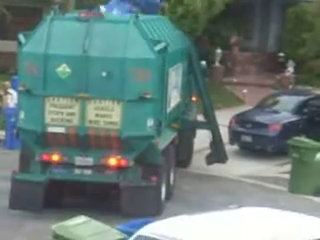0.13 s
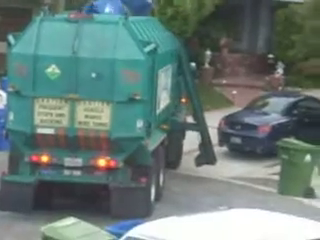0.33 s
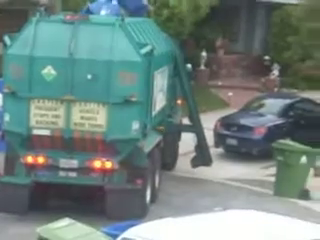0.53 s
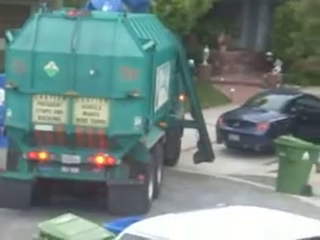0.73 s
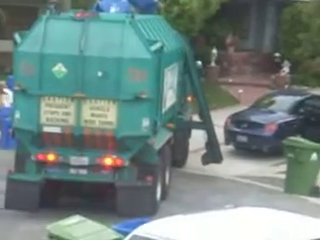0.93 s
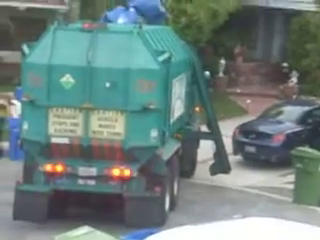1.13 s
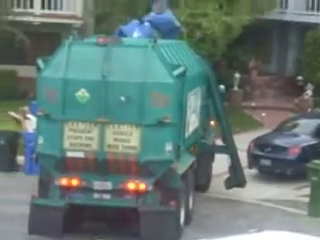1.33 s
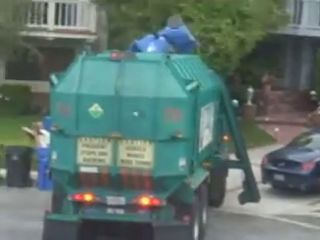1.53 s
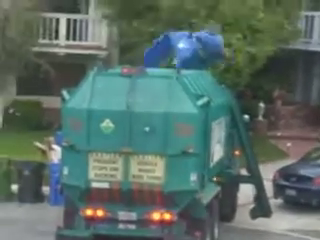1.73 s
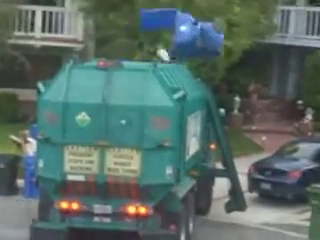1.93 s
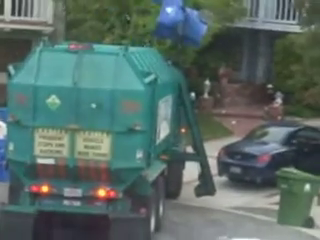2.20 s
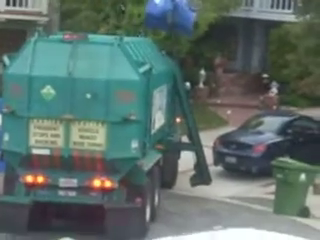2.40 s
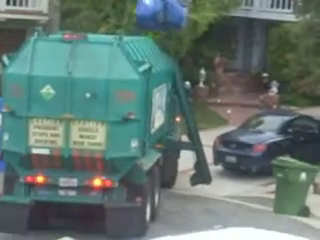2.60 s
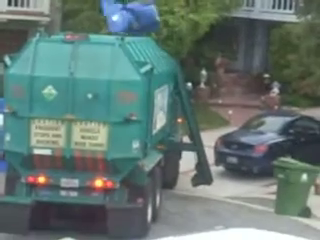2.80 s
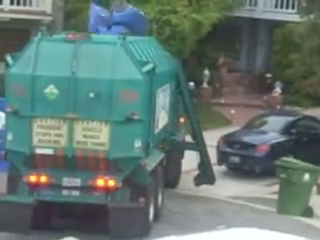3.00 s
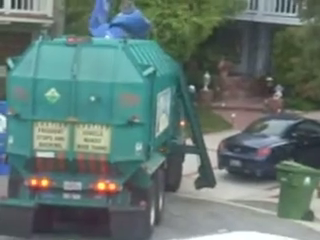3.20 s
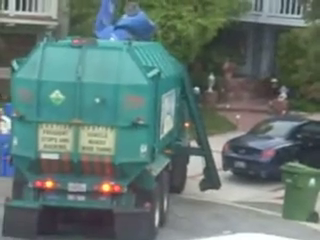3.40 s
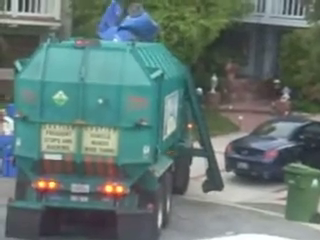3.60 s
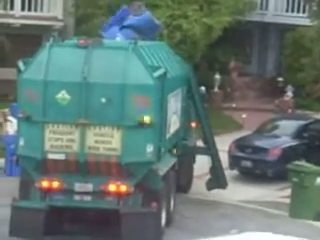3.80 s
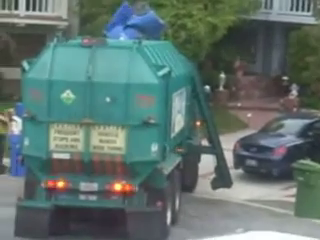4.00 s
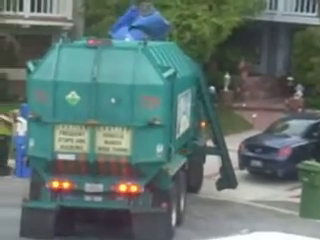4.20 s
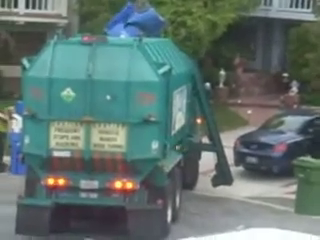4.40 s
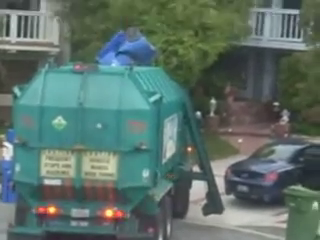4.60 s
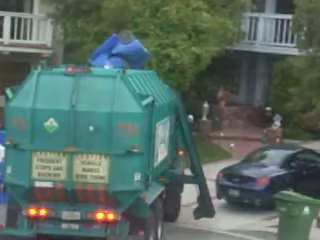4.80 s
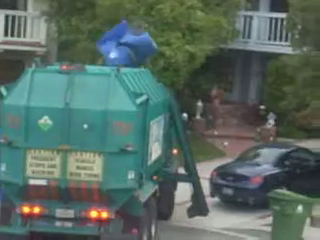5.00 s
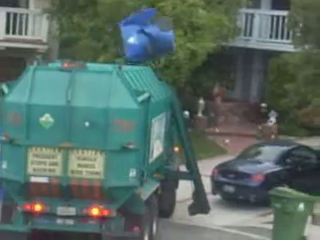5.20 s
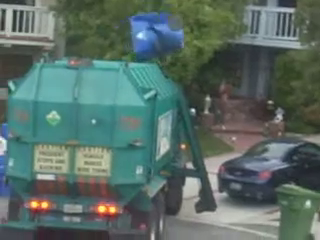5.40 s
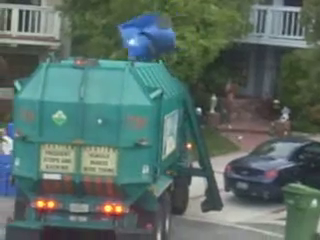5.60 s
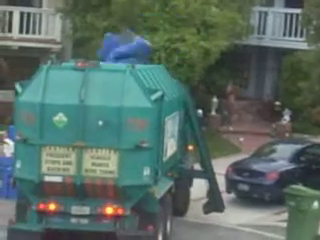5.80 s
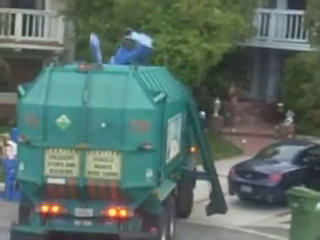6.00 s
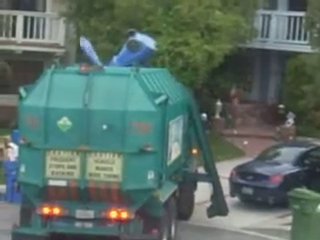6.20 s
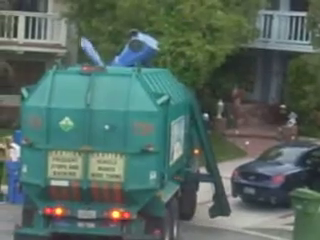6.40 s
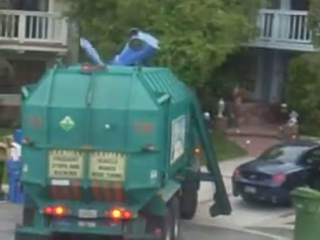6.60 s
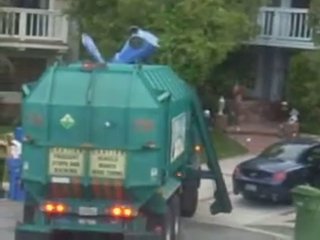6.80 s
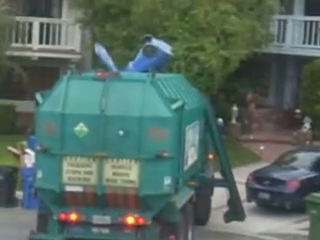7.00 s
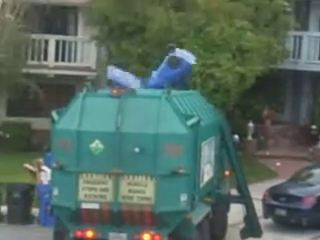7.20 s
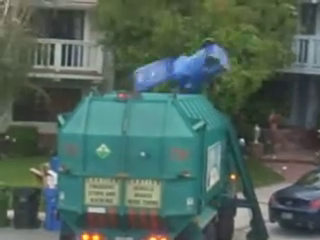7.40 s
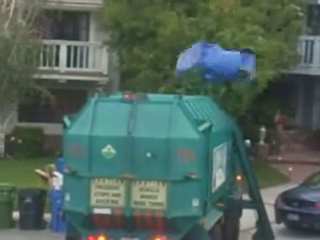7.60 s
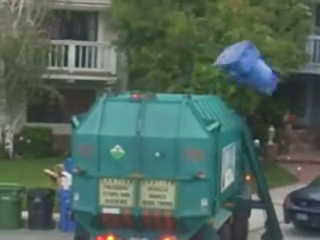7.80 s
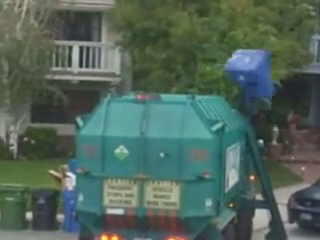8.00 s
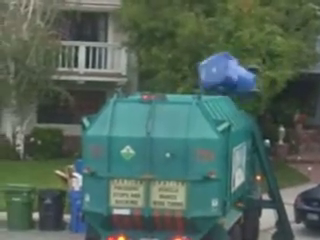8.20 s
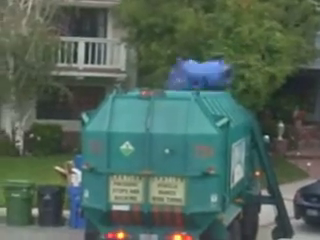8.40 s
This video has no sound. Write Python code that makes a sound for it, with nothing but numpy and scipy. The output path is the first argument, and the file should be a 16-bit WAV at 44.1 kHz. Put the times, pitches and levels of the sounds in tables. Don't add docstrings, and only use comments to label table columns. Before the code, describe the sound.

A diesel refuse truck revs and falls while its hydraulic pump whines, and a plastic bin slams the steel hopper in clanging, distorted bangs.

```python
import sys
import numpy as np
from scipy import signal
from scipy.io import wavfile
from scipy.ndimage import uniform_filter1d

SR = 44100
rng = np.random.default_rng(int(sys.argv[2]) if len(sys.argv) > 2 else 0)


def log_audio(samples):
    frames = np.atleast_2d(samples).T
    limited = np.clip(frames, -1, 1)
    pcm = np.round(limited * 32767).astype(np.int16)
    wavfile.write(sys.argv[1], SR, pcm)


def ratio(d):
    e = np.asarray(d, float) / 20
    return 10 ** e


N = 372634
CRUISE_HZ = 840


def rms_one(x):
    return x / np.sqrt(np.mean(x ** 2) + 1e-20)


def noise():
    return rng.standard_normal(N)


def in_time(rows):
    s, values = np.transpose(rows)
    return np.interp(np.arange(N) / SR, s, values)


def at_hz(points, hz):
    f, level_db = np.transpose(points)
    return np.interp(np.log(hz), np.log(f), level_db)


def drift(rate):
    r = np.exp(-80 * np.pi * rate / SR)
    slow = signal.lfilter([1], [1, -2 * r, r * r], rng.standard_normal(N // 40 + 2002))[2000:]
    return np.interp(np.arange(N) / 40, np.arange(len(slow)), rms_one(slow))


def colour(x, spectrum):
    hz, level_db = np.transpose(spectrum)
    edges = np.geomspace(hz[0], hz[-1], num=int(5 * np.log2(hz[-1] / hz[0])))
    centres = np.sqrt(edges[1:] * edges[:-1])
    gains = ratio(at_hz(spectrum, centres))
    total = np.zeros(N)
    for k, gain in enumerate(gains):
        band = signal.butter(2, edges[k:k + 2], "band", fs=SR, output="sos")
        total += (-1) ** k * gain * signal.sosfilt(band, x)
    return total / np.sqrt(np.sum(gains ** 2 * np.diff(edges)) / (SR / 2))


def ring(x, hz, t60):
    r = ratio(-60 / (t60 * SR))
    w = 2 * np.pi * hz / SR
    return signal.lfilter([0, 2 * np.sin(w) * np.sqrt(1 - r)], [1, -2 * r * np.cos(w), r * r], x)


def tone(hz, wobble_hz, flutter_db):
    phase = 2 * np.pi * (np.cumsum(hz + wobble_hz * drift(8.23)) / SR + rng.random())
    return np.sqrt(2) * np.sin(phase) * ratio(flutter_db * drift(7))


def street(x):
    out = x.copy()
    for lag_s, db in [(.023, -35.5), (.047, -32.5), (.081, -14), (.128, -16), (.19, -16.5)]:
        lag = round(lag_s * SR)
        out[lag:] += ratio(db) * x[:-lag]
    return out


def shaft_speed():
    # t/s, f/Hz
    speed = [(0, 570), (.45, 515), (1.2, 815), (1.43, 810), (1.75, 620), (2.2, 665), (2.63, 800),
             (3.08, 835), (3.64, 1068), (4.38, 1052), (4.87, 835), (5.15, 680), (5.85, 570), (6.65, 850),
             (7.39, 885), (7.75, 975), (8.1, 972), (8.45, 800)]
    flywheel_s = .1
    return uniform_filter1d(in_time(speed), round(flywheel_s * SR), mode="nearest")


def engine_load():
    # t/s, level/dB
    load = [(0, -4), (.45, -9), (.8, -1.5), (1.3, 1.5), (1.45, -12.5), (2.2, -7), (2.6, 2), (3.1, 8),
            (3.55, 10), (3.72, -1.5), (4.4, -3.5), (4.55, -13.5), (5.3, -18.5), (5.8, -8), (6.25, 1.5),
            (7.5, 1), (7.8, 8.5), (8.45, 4)]
    return in_time(load)


def pump(hz):
    # t/s, level/dB
    pressure = [(0, 0.5), (.6, -8), (1.45, -1), (1.7, 2), (2.3, -6.5), (2.8, 5.5), (3.3, 0.5), (3.9, 5),
                (4.75, 0), (6.3, -4), (6.6, -0.5), (8.1, 2.5), (8.3, -1.5), (8.45, -2.5)]
    # f/Hz, level/dB
    housing = [(640, -39), (800, -40), (1050, -46), (1580, -52), (1750, -37), (2250, -44), (2800, -38),
               (3200, -44)]
    overtones_db = [-1.5, .1, -4.5]
    # f/Hz, width/Hz, level/dB
    panels = [(1744, 25, -45.5), (130.4, 1.4, -53.5), (354, 14, -47.5), (550, 16, -57.5), (2910, 39, -46.5)]
    pressure_db = in_time(pressure)
    out = np.zeros(N)
    for k, db in enumerate(overtones_db, start=1):
        level_db = db - 3 + pressure_db + at_hz(housing, k * hz)
        for detune in (.99, 1.01):
            ripple = 1 + .6 * drift(60)
            out += ratio(level_db) * ripple * tone(k * hz * detune, 7 * k, 1.8)
    shake_db = 14 * np.log2(hz / CRUISE_HZ)
    for f, width_hz, db in panels:
        out += ratio(db + shake_db + 0.77 * drift(4.1)) * ring(noise(), f, 0.91 / width_hz)
    return out


def exhaust_tones(rate, load_db):
    # multiple of the firing rate, level/dB
    orders = [(2 / 3, -1), (4 / 3, -2), (5 / 3, -5), (7 / 3, -8), (3, -2), (3.56, -3)]
    # f/Hz, level/dB
    exhaust = [(25, -3), (45, 6), (72, 7), (90, 0), (110, -2.5), (135, 0.5), (170, -3.5), (250, 2)]
    # t/s, length/s, level/dB
    lopes = [
        (.55, 0.33, -30),
        (1.75, 0.58, -30),
        (4.052, 0.37, -37),
        (5.745, 0.46, -38),
    ]
    second_db = -39.5 + .4 * load_db + at_hz(exhaust, 2 * rate)
    tones = ratio(-28.5 + load_db) * tone(rate, .4, 1.6)
    tones += ratio(second_db) * tone(2 * rate, .7, 2.2)
    for k, db in orders:
        order_db = -42 + .2 * load_db + db + at_hz(exhaust, k * rate)
        tones += ratio(order_db) * tone(k * rate, 0.59, 3.0)
    t = np.arange(N) / SR
    lope = np.full(N, ratio(-47))
    edge_s = 0.12
    for s, length, db in lopes:
        lope += ratio(db) * np.clip(np.minimum(t - s, s + length - t) / edge_s, 0, 1)
    half_orders = ratio(0.5) * tone(rate / 2, .4, 1.5) + tone(3 / 2 * rate, .5, 1.5)
    return tones + lope * half_orders


def rumble(load_db):
    low = signal.butter(2, [42, 140], "band", fs=SR, output="sos")
    level_db = -40.5 + .3 * load_db + 1.8 * drift(0.9)
    return ratio(level_db) * rms_one(signal.sosfilt(low, noise()))


def block_noise(rate, octaves, load_db):
    # f/Hz, level/dB per Hz
    clatter_spectrum = [(750, -47.5), (950, -25), (1170, -21.5), (1440, -17), (1750, -11.5), (2100, -12.5),
                        (2500, -13), (3000, -12.5), (3500, -23.5), (3900, -3.5), (4300, -21.5), (5200, -15)]
    drone_spectrum = [(76, -51), (130, -5.5), (243, -1.5), (280, -6.5), (334, -6.5), (572, -4), (826, -5),
                      (1140, -16), (1400, -10), (1820, -43), (3080, -120)]
    swing_s, swing_rise_s = 7.77, 0.4
    swing = np.clip((np.arange(N) / SR - swing_s) / swing_rise_s, 0, 1)
    clatter_db = -30 + 4.5 * octaves + 0.049 * load_db + 4.5 * swing
    drone_db = -33 + 0.048 * load_db + 9 * swing
    throb = np.cos(2 * np.pi * np.cumsum(rate) / SR)
    clatter = colour(noise() * ratio(1.1 * throb + 0.18 * drift(21)), clatter_spectrum)
    drone = colour(noise() * ratio(0.68 * throb + 1.1 * drift(48)), drone_spectrum)
    return ratio(clatter_db - 3.5) * clatter + ratio(drone_db - 4.5) * drone


def engine(teeth_hz, load_db):
    rate = teeth_hz / 15.7
    octaves = np.log2(teeth_hz / CRUISE_HZ)
    return exhaust_tones(rate, load_db) + rumble(load_db) + block_noise(rate, octaves, load_db)


def impacts():
    # t/s, steel level/dB, bin level/dB re steel, rise/s, jolt length/s
    big_blows = [(.127, -14, -8, .006, .03), (.146, -5, -9, .012, .03), (.262, -12, -7, .01, .03),
                 (.343, -15, -7, .01, .03), (2.056, -8, -9, .003, .012), (2.864, -12, -8, .008, .04),
                 (2.916, -2, -8, .003, .025), (3.04, -14, -10, .02, .04), (3.13, -9, -14, .008, .007),
                 (3.175, -12, -14, .004, .017), (5.742, -20, -4, .003, .03), (5.773, -3, -9, .022, .028),
                 (5.965, -16, -12, .006, .012), (6.005, -15, -10, .003, .012), (6.03, -12, -12, .006, .007),
                 (8.27, -13, -9, .012, .04), (8.342, 4.5, -6, .007, .07)]
    # t/s, steel level/dB, bin level/dB re steel, T60/s
    knocks = [(1.767, -11, -20, .2), (2.056, -6, -14, .08), (2.383, -9, -17, .15), (2.746, -15, -15, .12),
              (2.916, 7, -14, .14), (2.937, 6, -18, .12), (2.956, 4, -22, .08), (3.141, 0, -22, .09),
              (3.839, -15, -12, .06), (5.171, -7, -16, .07), (5.426, -14, -2, .05), (5.783, -1, -14, .12),
              (6.036, -3, -22, .08), (7.357, -11, -15, .2)]
    # t/s, steel level/dB, bin level/dB re steel, T60/s
    rattles = [(0.712, -26, 1, .5), (1.543, -15.5, -8, .14), (1.563, -18, -25, .48), (1.881, -22, -8, .22),
               (1.98, -23.5, -8, .3), (2.157, -28.5, -7, .13), (2.33, -23, -10, .34),
               (2.418, -15.5, -12, .43), (2.527, -18, -7.5, .38), (2.655, -19, -21, .39),
               (3.295, -27.5, -11.5, .18), (4.862, -17.5, -11, .25), (4.887, -18, -7.5, .54),
               (5.008, -23, -12, .34), (5.189, -19.5, -11, .23), (5.628, -19.5, -14.5, .11),
               (6.16, -24, -4, .45), (6.865, -34, -11, .23), (7.115, -20, -10.5, .44),
               (7.713, -15.5, -6, .23), (7.931, -17.5, -4.5, .41), (8.056, -20.5, -14, .53)]
    events = [(*blow, min(.13 + 10.5 * blow[-1], .48)) for blow in big_blows]
    events += [(s, db, bin_db, .0015, .003, t60) for s, db, bin_db, t60 in knocks]
    events += [(s, db, bin_db, .0069, .011, t60) for s, db, bin_db, t60 in rattles]
    return events


def jolts(events):
    steel, plastic = np.zeros(N), np.zeros(N)
    for s, db, bin_db, rise, length, t60 in events:
        start = round(s * SR)
        span = slice(start, start + SR // 2)
        t = np.arange(len(steel[span])) / SR
        fall = ratio(-60 * np.maximum(t - rise - length, 0) / t60)
        steel[span] += (ratio(db - 9) * np.minimum(t / rise, 1) * fall) ** 2
        late = np.minimum(t / (rise + .004), 1)
        plastic[span] += (ratio(db + bin_db - 8.5) * late * fall ** 0.5) ** 2
    return np.sqrt(steel), np.sqrt(plastic)


def struck(force, spectrum, modes, ring_db, lumpy_db):
    lumps = force * ratio(lumpy_db * drift(60))
    out = colour(lumps * noise() + 1e-18, spectrum)
    for hz, db, t60 in modes:
        level_db = db + ring_db + 1.0 * drift(3.2)
        out += ratio(level_db) * ring(lumps * noise() + 1e-18, hz, t60)
    return out


def steel_hopper(force):
    # f/Hz, level/dB per Hz
    crash = [(800, -40.5), (1050, -27), (1400, -7.5), (1750, -9), (2100, -5), (2600, -7), (3100, -2.5),
             (3500, -9), (3900, -7), (4300, 9.5), (5200, -5)]
    # f/Hz, level/dB, T60/s
    modes = [(1960, -3, .08), (2073, -2, .08), (2213, -5, .08), (2616, 0, .1), (2789, -1, .12),
             (2980, -4, .1), (3200, -3, .1), (3385, -5, .1), (3560, -5, .1), (3790, -2, .08)]
    return struck(force, crash, modes, ring_db=-15, lumpy_db=1.49)


def plastic_bin(force):
    # f/Hz, level/dB per Hz
    crash = [(76, -38), (130, -6), (301, -4), (357, 2.5), (442, -6), (584, 2.5), (795, -2.5), (1020, -8.5),
             (1300, -15.5), (1690, -27), (2860, -120)]
    # f/Hz, level/dB, T60/s
    modes = [(355, -2, .2), (499, -2, .12), (562, -2, .12), (606, 0, .12), (694, -6, .1), (785, -3, .12)]
    return struck(force, crash, modes, ring_db=-8, lumpy_db=1.7)


def cracks():
    # t/s, peak level/dB
    contacts = [(.179, .5), (1.768, -14), (2.058, -10), (2.385, -14), (2.918, 2), (3.839, -9), (5.4265, -1),
                (5.784, -2), (5.812, 1.5), (5.173, -10), (7.358, -9), (8.073, -14), (8.348, -4)]
    s, db = np.transpose(contacts)
    clicks = np.zeros(N)
    clicks[np.round(s * SR).astype(int)] = ratio(db + 18)
    band = signal.butter(1, [1400, 4200], "band", fs=SR, output="sos")
    return signal.sosfilt(band, clicks + 1e-18)


def scene():
    teeth_hz = shaft_speed()
    steel, plastic = jolts(impacts())
    blows = steel_hopper(steel) + plastic_bin(plastic) + cracks()
    mix = engine(teeth_hz, engine_load()) + pump(teeth_hz) + street(blows)
    return mix[None]


def top_cut(x):
    return signal.sosfilt(signal.butter(12, 15850, fs=SR, output="sos"), x)


def record(dry):
    capsule = signal.butter(2, 32, "high", fs=SR, output="sos")
    heard = signal.sosfilt(capsule, dry)
    squeezed = .85 * np.tanh(heard / .85)
    steep_cut = signal.cheby2(14, 85, 4870, fs=SR, output="sos")
    narrow = signal.sosfilt(steep_cut, squeezed)
    overload = .725
    return top_cut(np.clip(narrow, -overload, overload))


dry = scene()
out = record(dry)
log_audio(out)
```